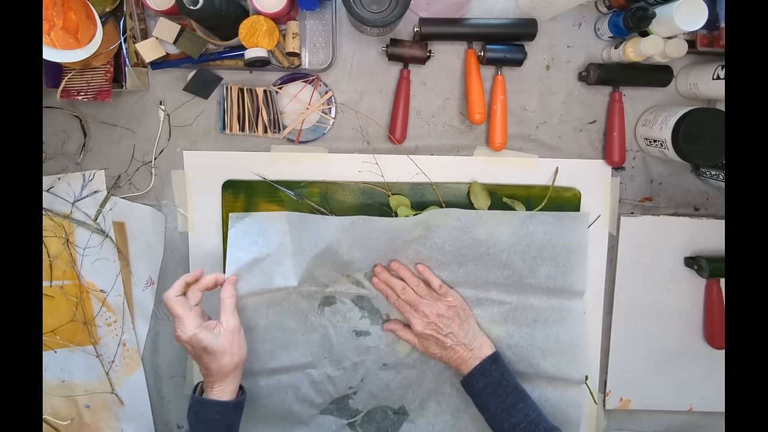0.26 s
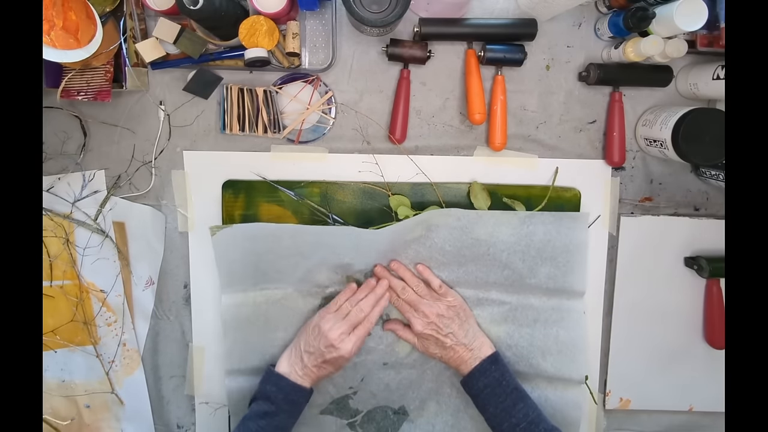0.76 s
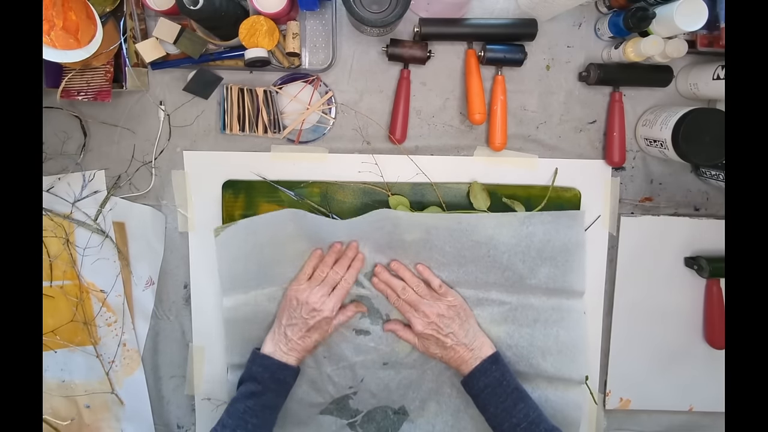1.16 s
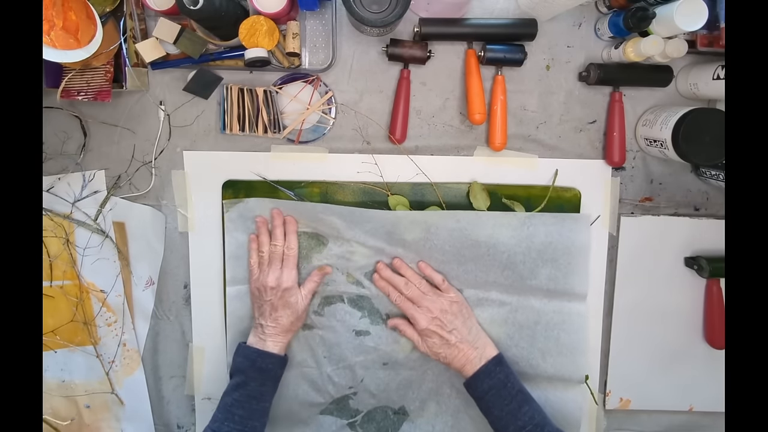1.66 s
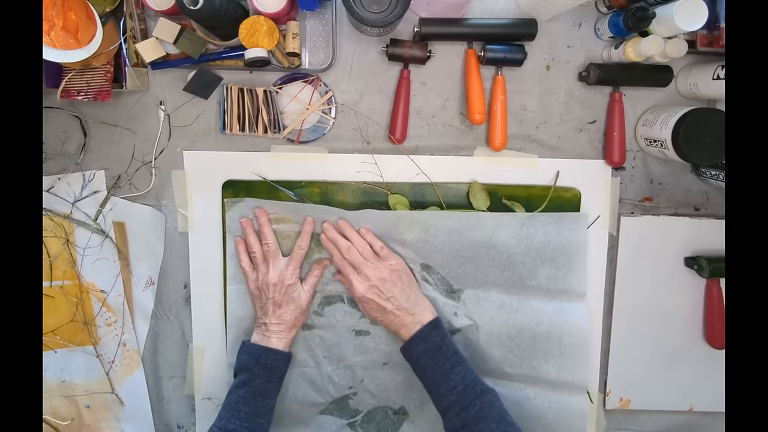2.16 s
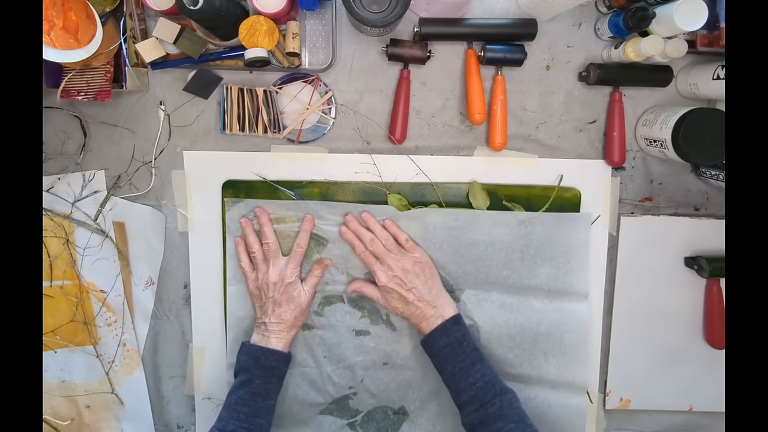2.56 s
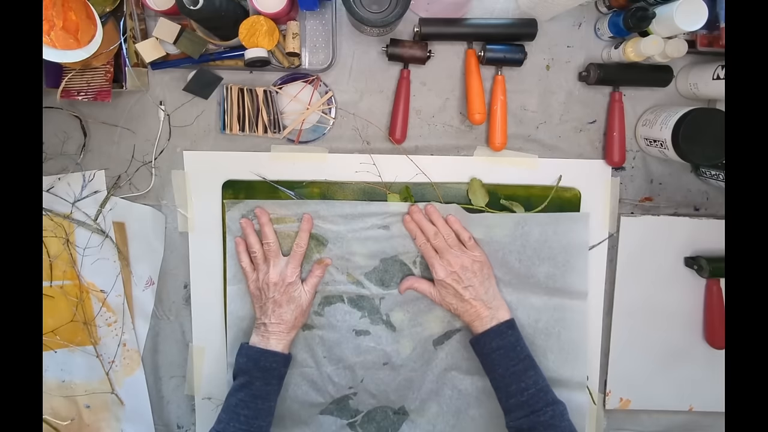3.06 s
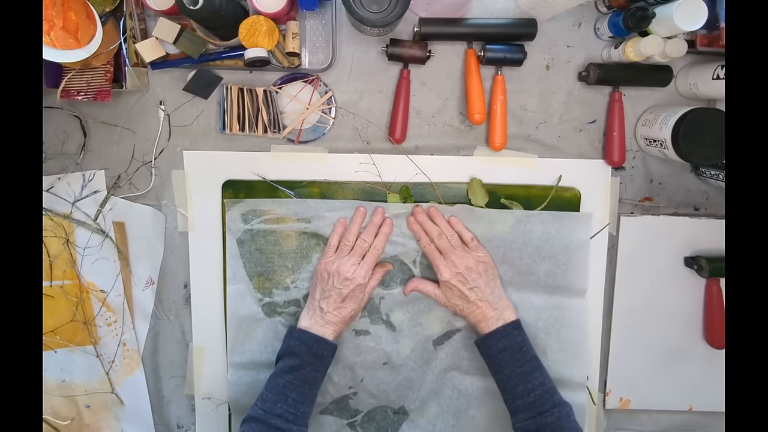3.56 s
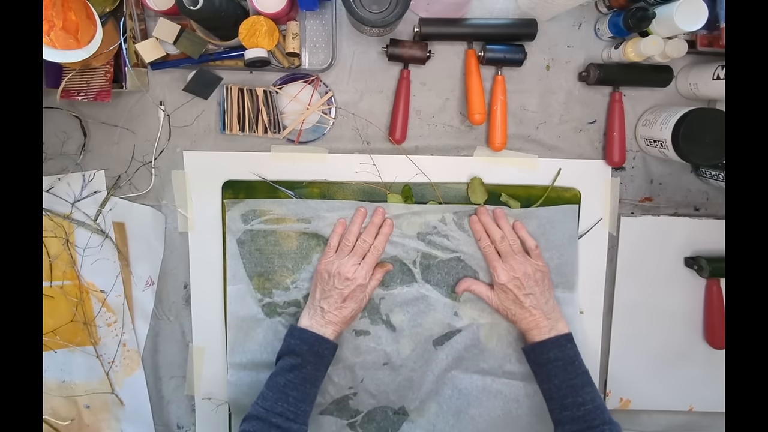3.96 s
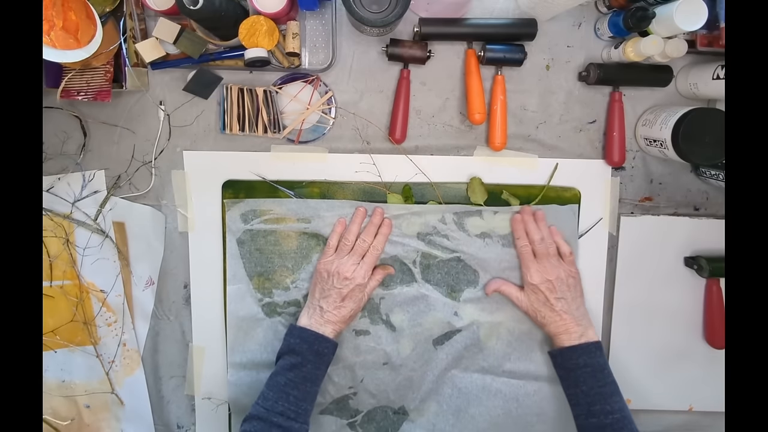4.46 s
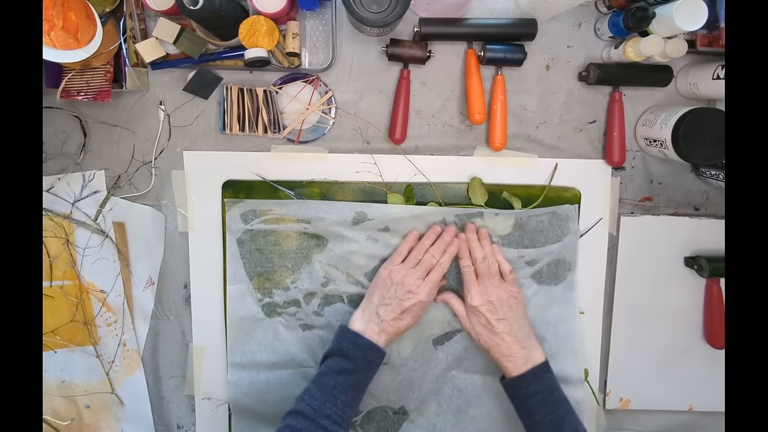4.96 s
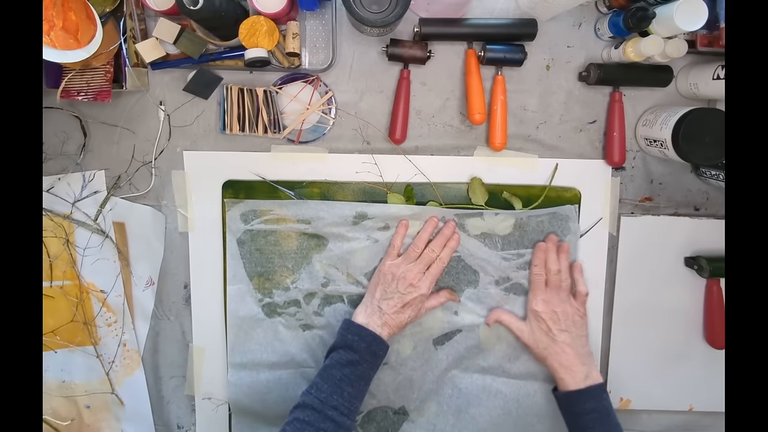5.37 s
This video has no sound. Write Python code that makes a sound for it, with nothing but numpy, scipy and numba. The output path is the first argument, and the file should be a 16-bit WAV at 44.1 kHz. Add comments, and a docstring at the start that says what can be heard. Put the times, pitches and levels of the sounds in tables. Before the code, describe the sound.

Thin tissue paper is smoothed by hand over a plate on a table, heard close and nearly dry in a small quiet room. From 0 to 0.8 s there are only light, broken rustles, with brief swells near 0.2 and 0.5 s. From about 0.85 to 2.1 s a longer stroke hisses and crackles, with a sharp snap at 1.2 s, then thins away. At 2.2 s a firmer, fuller stroke begins, dense with bright crinkles; the loudest snap cracks at 2.7 s, and it fades by 3.4 s. Another stroke runs from 3.5 to 4.1 s, then an uneven one from 4.2 to 4.85 s, a quick flick at 4.9 s, and a last stroke from 5.07 s that dies out by 5.6 s. The paper is bright, crisp and thin, with little body. Faint room air, low rumble and mains hum remain underneath, with one barely audible short low tone near 4.7 s.

```python
"""Hands smooth a sheet of thin tissue paper over a plate on a work table, in a quiet studio.
A small microphone hangs over it: creases buckle in short bright snaps over the hiss of sliding palms.
Both are noise, following hand strokes in four bands; the table top mirrors them half a millisecond late.
A short tail of decaying noise places them in a small room.
Behind lie filtered-noise air and rumble, a wavering sine hum and one short low tone."""
import sys
import numpy as np
from scipy import signal
from scipy.fft import rfft, irfft, next_fast_len
from scipy.io import wavfile
from scipy.ndimage import uniform_filter1d
from numba import njit

SR = 44100
rng = np.random.default_rng(int(sys.argv[2]) if len(sys.argv) > 2 else 0)


def master(y):
    """Save y as 16-bit WAV."""
    cut = np.clip(np.atleast_2d(y).T, -1, 1)
    pcm = np.round(cut * 32767)  # scale
    wavfile.write(sys.argv[1], SR, pcm.astype(np.int16))


def gain_from_db(level_db):
    """Convert decibel levels to linear amplitude factors (20 dB per decade)."""
    decades = np.asarray(level_db, float) / 20
    return 10 ** decades


N = 247842  # samples, 5.62 s

# Hand strokes over the sheet, one list for each.
# Each row: time in seconds, level in dB that guides the rustle at 4-9 kHz.
HAND_STROKES = [
    [(0, -71.5), (.016, -73), (.038, -53.5), (.079, -64), (.144, -57.5), (.17, -46), (.205, -37.5),
     (.259, -50.5), (.324, -57.5), (.4, -56.5)],
    [(.429, -46.5), (.482, -49.5), (.506, -33), (.553, -55), (.582, -47), (.618, -55), (.683, -59),
     (.708, -66), (.8, -67)],
    [(.852, -63), (.93, -40), (.985, -43.5), (1.03, -39), (1.052, -35.5), (1.087, -46.5), (1.14, -41),
     (1.28, -36), (1.395, -43), (1.44, -37.5), (1.536, -46.5), (1.602, -44), (1.64, -47.5), (1.785, -45),
     (1.854, -52), (1.954, -43.5), (1.998, -51), (2.039, -59.5), (2.126, -59.5), (2.179, -65)],
    [(2.2, -38), (2.22, -41.5), (2.268, -40), (2.299, -49.5), (2.327, -41.5), (2.41, -38.5), (2.5, -45.5),
     (2.587, -45), (2.686, -37), (2.707, -42), (2.744, -39), (2.905, -40.5), (2.939, -38.5), (3.107, -39.5),
     (3.139, -50.5), (3.306, -53.5), (3.348, -62), (3.425, -71.5), (3.459, -63), (3.501, -54.5)],
    [(3.526, -40), (3.604, -49), (3.711, -39.5), (3.848, -40), (3.918, -43.5), (3.957, -40), (4.075, -45.5),
     (4.14, -60)],
    [(4.19, -44), (4.264, -56), (4.309, -48), (4.345, -54), (4.43, -42), (4.524, -39.5), (4.62, -45),
     (4.717, -48.5), (4.813, -39), (4.879, -63)],
    [(4.915, -40), (4.961, -61), (4.998, -57.5), (5.041, -73), (5.056, -69)],
    [(5.068, -39), (5.08, -39), (5.13, -44), (5.24, -39), (5.34, -44), (5.395, -38), (5.464, -43.5),
     (5.517, -48), (5.547, -59), (5.619, -73)],
]
# Loud creases. Each row: time of the peak in seconds, peak level at 4-9 kHz in dB,
# dull part in dB re that peak, bright part in dB re that peak, fade length in ms.
LOUD_CREASES = [(.2109, -33, 0.5, 2, 2.4), (.237, -37, -16, -5, .9), (0.3185, -35, 3, 8, 0.34),
                (0.3421, -38, -11, -7, 1.1), (.47, -33.5, -22, 1, 1.6), (.497, -25, -5.5, 12, 0.55),
                (.5032, -26.5, -13, 1, 4.1), (.5575, -39, -4, 3, 2.1), (0.5838, -38, -4, 4, 4.1),
                (0.6764, -41, -9, -3, 2.9), (.727, -50, -1, -8, 2.3), (0.8191, -41.5, -7.5, 3.5, 3.3),
                (.9348, -38, 7, 9, 0.55), (1.045, -30.5, -11, 3, 5.5), (1.099, -37, -8, 2.5, 8),
                (1.1302, -35.5, -0.5, 5, 3.3), (1.1802, -26, 0.5, 2, 1.4), (1.2, -19, -10, 4, .68),
                (1.223, -27, -11, -1, .9), (1.234, -28, -23, 6, .9), (1.3182, -24.5, -20, -13, 1),
                (1.3264, -26, -10, 0, 1.1), (1.3955, -35, -15, 12, .7), (1.553, -42, -1, 3, 5),
                (1.5933, -30, -13, 0, 1), (1.6837, -32.5, -13, 7, 1.3), (1.863, -33.5, -13, -1, 1.1),
                (1.8989, -33, -3, 7, 1.1), (1.9606, -27.5, -8, 7, .7), (1.9873, -35.5, -1.5, 2, 7),
                (2.006, -36, -1, 0, 4.2), (2.0387, -44, -14, -1, 2.6), (2.1438, -41.5, -5, 6, 1.2),
                (2.204, -30.5, -5.5, 2, 5.5), (2.316, -22.5, -16, 2.5, 0.62), (2.334, -34.5, -13, 15, .9),
                (2.401, -28.5, -21, -2, 2.1), (2.4243, -31.5, -9, 4, 1.1), (2.482, -31.5, -8, 4.5, 2.3),
                (2.4873, -25.5, -6, -1, 0.79), (2.5382, -32, -17, 6, .83), (2.618, -35, -2, 3, 3.3),
                (2.64, -33, -2, 9, 0.67), (2.6662, -28, 1, 4, 1.1), (2.6864, -22, -1, 6, 0.48),
                (2.696, -27.5, -4, 6, 2.3), (2.712, -13, -14, 6, .45), (2.729, -32, -14, 10, 1.8),
                (2.7818, -26, -6.5, 6, 1.4), (2.8115, -22, -8, 8, 1), (2.8418, -28, -12, 1, .8),
                (2.8555, -36.5, -3, 10, 5), (2.9282, -29, -11, 11, .4), (2.9583, -31.5, -6, 13, .7),
                (3.0206, -33, -7, 3, 2), (3.0352, -28, -5, 6, 2), (3.111, -31, -8, 6.5, 2.4),
                (3.188, -37.5, -9, 0, 2.6), (3.2603, -39.5, -2.5, 1, 6.2), (3.2969, -38.5, -6, 2, 2.7),
                (3.3726, -42, -10, 4.5, 1.3), (3.4922, -37, -10, 2, .57), (3.522, -29.5, -11, 3, 2.6),
                (3.5686, -34, -12, 6, .7), (3.582, -29, -23, 5, .5), (3.6271, -31, -7, 0, 1.4),
                (3.7074, -33.5, -15, 2, 2.3), (3.786, -30, -6, 4, 1.5), (3.8472, -28, -4, -6, 2),
                (3.8535, -26.5, -13, 14, .48), (3.9583, -29.5, -12, -5, 3.6), (3.9916, -32, -4, 0, 1.1),
                (4.013, -32.5, -9, -1, 4.3), (4.0302, -30, -16, -6, .9), (4.077, -31, -19, 5, 1),
                (4.1163, -35.5, -23, 6, 1), (4.2247, -38.5, -5, 3, 2.6), (4.3222, -37, -11, 7, .83),
                (4.519, -36, -14, 3, 6.5), (4.6696, -27, -21, 9, .4), (4.6935, -37.5, -3, 8, 1),
                (4.7419, -28, -6, -3, .52), (4.747, -30, -9, 0, 1.1), (4.781, -31, -16, 3, 1.2),
                (4.8292, -35.5, -5.5, 4, 3), (4.849, -36, -17, 0, 2), (4.902, -34, -6.5, 1, 4.6),
                (4.9208, -31, -4, 0, 2.8), (4.9562, -41, -9, 0, 2.6), (4.9882, -44, -5, 6, 2.9),
                (4.9927, -39, -16, 4, 1.2), (5.097, -34, -4, 2, 1.6), (5.118, -29, -19, -6, 1.7),
                (5.394, -33, 1, 8, 1.1), (5.4601, -30.5, -1, 2, 2.3), (5.5605, -39, -16, 0, .8),
                (5.565, -43.5, -1, 1.5, 2)]
# Brightness of the rustle, duller while the sheet flaps free, brighter pressed flat.
# Each row: time in seconds, brightness in dB.
BRIGHTNESS = [(0, -2.5), (.8, -2), (1.1, -.5), (1.8, 1.5), (2.2, 0), (2.7, -.5), (3.1, 1.5), (3.5, -.5),
              (4.1, 0), (4.5, 1.5), (5.1, 0), (5.5, 1.5)]
# The four bands of paper sound: middle, dull, bright, body. Each row: low edge in Hz, high edge in Hz.
PAPER_BANDS = [(4000, 9000), (1500, 4000), (9000, 17000), (200, 1500)]
# How each of those bands follows the hand. Each row: offset at a firm stroke in dB,
# dB per dB of stroke level, dB per dB of brightness.
BAND_FOLLOW = [(-.5, 1, 0), (-5, .66, -1), (2.5, 1.05, 1), (-12, 0.67, -.5)]
# Colour of the sheet at the microphone. Each row: frequency in Hz, density in dB per Hz.
SHEET_COLOUR = [(150, -32), (350, -27.5), (650, -24), (920, -13.5), (1250, -13), (2300, -8), (3200, -3.5),
                (4100, -6.5), (5600, -4.5), (6400, -3), (7200, -2.5), (8500, -0.5), (9850, -3),
                (11800, 2.5), (13200, 1), (14500, 1), (15700, -2)]
# Colour of the quiet room. Each row: frequency in Hz, density in dB per Hz.
AIR_COLOUR = [(53, -52), (90, 1.5), (176, -10), (408, -22), (518, -16), (763, -16), (888, -12.5),
              (1010, -6), (2500, -24.5), (8580, -37), (10200, -38), (11900, -30), (15700, -29)]
# Low rumble of the building and the table. Each row: time in seconds, level in dB before it wavers.
RUMBLE_LEVEL = [(0, -69), (.6, -71), (1.28, -59.5), (1.5, -70), (2.7, -73), (3.2, -66), (3.8, -68),
                (4.5, -72), (5.62, -68)]
# Mains hum. Each row: frequency in Hz, rms level in dB before it wavers.
MAINS_HUM = [(59.5, -76), (120, -71)]
# One short low tone. A single row: centre in seconds, frequency in Hz, peak level in dB, length in seconds.
SHORT_TONE = (4.703, 141, -52, .075)

FIRM_DB = -42  # stroke level of a firm hand
RISE = .35  # climb of a snap, as a share of its fade


def paper():
    """Palm hiss and small creases follow the strokes, loud creases join; the sheet colours each band."""
    seconds = np.arange(N) / SR
    firmness_db = np.interp(seconds, *np.vstack(HAND_STROKES).T) - FIRM_DB
    bright_db = np.interp(seconds, *np.transpose(BRIGHTNESS))
    swarms = small_creases()
    creases = loud_creases()
    shared_flicker = walk(50)
    tick = np.zeros(N)
    tick[N // 2] = 1
    out = 0
    for band, follow, swarm, loud in zip(PAPER_BANDS, BAND_FOLLOW, swarms, creases):
        offset_db, per_level, per_bright = follow
        stroke = gain_from_db(2 * (FIRM_DB + offset_db + per_level * firmness_db + per_bright * bright_db))
        rustle = stroke * (palm_hiss(firmness_db, shared_flicker) + swarm)
        shake = rng.standard_normal(N) * np.sqrt(rustle)
        # a buckling crease flips fibres either way with even force
        shake = shake + np.sign(rng.standard_normal(N)) * np.sqrt(loud)
        sos = signal.butter(3, band, "band", fs=SR, output="sos")
        # the sheet radiates the shaking with its own colour; the band keeps its power
        radiated = colour(signal.sosfilt(sos, shake), SHEET_COLOUR)
        ring = colour(signal.sosfilt(sos, tick), SHEET_COLOUR)
        out = out + radiated / np.sqrt(np.sum(ring ** 2))
    return out


def small_creases(count=9000, spread_db=6.0, tint_db=4.5, snap_ms=0.73, level_db=-3.5):
    """Power of a swarm of tiny snaps at random times, with each snap tinted at random per band."""
    chance = rng.random((count, 3))
    tint = tint_db * rng.standard_normal((count, 4))
    peak = (chance[:, 0] * N).astype(int)
    # few big buckles, many tiny ones
    size_db = -spread_db * np.log(chance[:, 1] + .012)
    length = snap_ms * (.5 + chance[:, 2]) * SR / 1000
    biggest_db = 21
    swarms = []
    for band_tint in tint.T:
        size = gain_from_db(np.minimum(size_db + band_tint, biggest_db))
        swarm = bursts(peak, size, length, RISE)
        swarms.append(gain_from_db(2 * level_db) * swarm / swarm.mean())
    return swarms


def loud_creases(body_db=-9.0):
    """Power of the single loud buckles in each band; the body lies below the dull part."""
    at, peak_db, dull_db, bright_db, fade_ms = np.transpose(LOUD_CREASES)
    peak = (at * SR).astype(int)
    length = np.clip(fade_ms, .2, 12) * SR / 1000
    parts_db = (0, dull_db, bright_db, dull_db + body_db)
    return [bursts(peak, gain_from_db(peak_db + part_db), length, RISE) for part_db in parts_db]


@njit
def bursts(peak, size, length, rise):
    """Power envelope of snaps: a quick climb to the peak sample, then a fade over the snap's length."""
    power = np.zeros(N)
    for k in range(len(peak)):
        first = max(-int(5 * rise * length[k]), -peak[k])
        last = min(int(5 * length[k]), N - peak[k])
        for i in range(first, last):
            slope = -i / length[k] if i > 0 else i / (rise * length[k])
            power[peak[k] + i] += size[k] ** 2 * np.exp(2 * slope)
    return power


def palm_hiss(firmness_db, shared_flicker, level_db=-3.5, flicker_db=2.5):
    """Power of sliding skin beside the crackle: a light touch hisses less, a firm stroke more."""
    press_db = np.clip(.3 * firmness_db, -5, 2)
    flicker = shared_flicker + .5 * walk(80)
    return gain_from_db(2 * (level_db + press_db + flicker_db * flicker))


def table(x):
    """The table top returns a close copy that combs the treble."""
    lag_s, mirror = .00047, .25  # delay, gain of the copy
    hz = np.arange(N // 2 + 1) * SR / N
    comb = 1 + mirror * np.exp(-2j * np.pi * hz * lag_s)
    return irfft(rfft(x) * comb, N) / np.sqrt(1 + mirror ** 2)


def walls(x, t60_s=0.045, wet_db=-12.5, damp_hz=6760.0):
    """Diffuse, duller tail of a small furnished room: noise that dies away, low-passed."""
    t = np.arange(SR // 2) / SR
    onset = np.clip(t / 0.0006, 0, 1)
    tail = rng.standard_normal(len(t)) * np.exp(-np.log(1000) * t / t60_s) * onset
    tail = signal.lfilter(*signal.butter(1, damp_hz, fs=SR), tail)
    tail = tail / np.sqrt(np.sum(tail ** 2))
    return gain_from_db(wet_db) * signal.fftconvolve(x, tail)[:N]


def air(level_db=-65.5):
    """Steady hiss of the quiet room: noise with the room's colour."""
    return gain_from_db(level_db) * unit(colour(rng.standard_normal(N), AIR_COLOUR))


def rumble():
    """Building and table rumble that comes and goes: low noise under a wavering level."""
    points = [(25, -37), (40, -4.0), (60, 4.5), (90, -9.0), (160, -15), (400, -74)]  # Hz, dB
    low = unit(colour(rng.standard_normal(N), points))
    level_db = np.interp(np.arange(N) / SR, *np.transpose(RUMBLE_LEVEL))
    return gain_from_db(level_db + 2.5 * walk(9)) * low


def hum():
    """Mains hum: sines at random phase whose levels waver."""
    t = np.arange(N) / SR
    out = 0
    for hz, db in MAINS_HUM:
        level = np.sqrt(2) * gain_from_db(db + 1.15 * walk(9.8))
        out = out + level * np.sin(2 * np.pi * (hz * t + rng.random()))
    return out


def low_tone():
    """One short low sine that swells and fades along half a cosine."""
    t = np.arange(N) / SR
    at, hz, db, length = SHORT_TONE
    swell = np.cos(np.pi * np.clip((t - at) / length, -.5, .5))
    return gain_from_db(db) * swell * np.sin(2 * np.pi * hz * t)


def unit(x):
    """Scale to rms 1."""
    return x / np.sqrt(np.mean(x ** 2))


def colour(x, points):
    """Filter by (Hz, dB) points joined on a log frequency axis."""
    hz, db = np.transpose(points)
    size = next_fast_len(N)
    bins = np.arange(size // 2 + 1) * SR / size + 1  # 1 Hz up, to keep the log finite
    gain = gain_from_db(np.interp(np.log(bins), np.log(hz), db))
    return irfft(rfft(x, size) * gain, size)[:N]


def walk(rate):
    """Random levels held 1 / rate s and slewed twice; spread near 1."""
    k = max(int(SR / rate), 2)
    held = np.repeat(rng.standard_normal(N // k + 1), k)
    return 1.42 * uniform_filter1d(uniform_filter1d(held, k), k)[:N]


def scene():
    """Paper close on the table, its tail in the room, and the background."""
    near = table(paper())
    background = air() + rumble() + hum() + low_tone()
    return (near + walls(near) + background)[None]


def roll_off(x):
    """The treble ends steeply here."""
    return signal.sosfilt(signal.butter(12, 17150, fs=SR, output="sos"), x)


def record(dry):
    """The recorder cuts the top steeply above 15.8 kHz."""
    top_cut = signal.ellip(12, .3, 60, 15800, fs=SR, output="sos")
    mix = signal.sosfilt(top_cut, dry)
    return roll_off(mix)


dry = scene()
out = record(dry)
master(out)
```